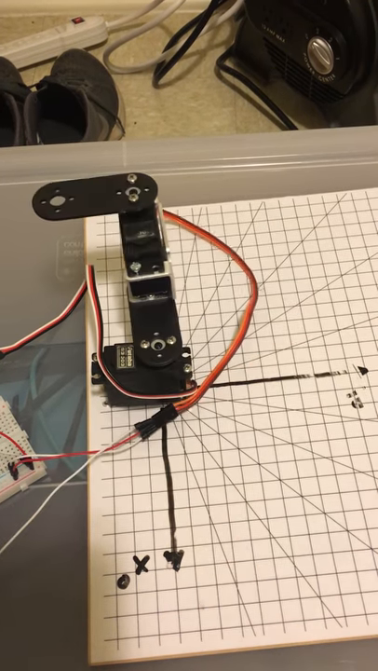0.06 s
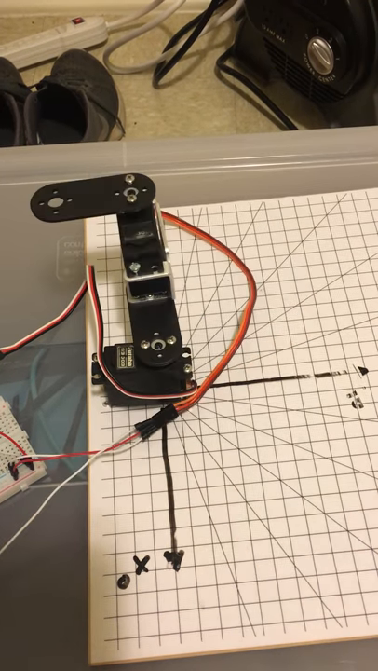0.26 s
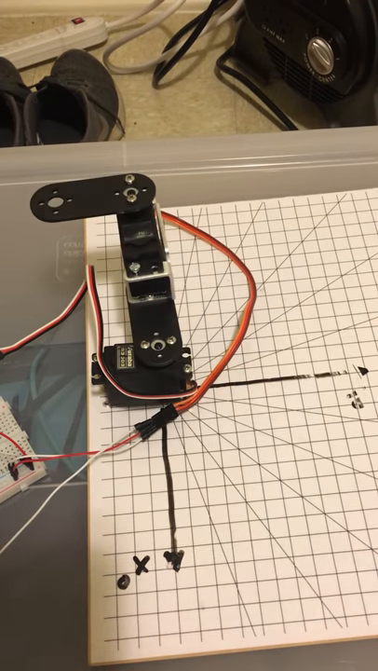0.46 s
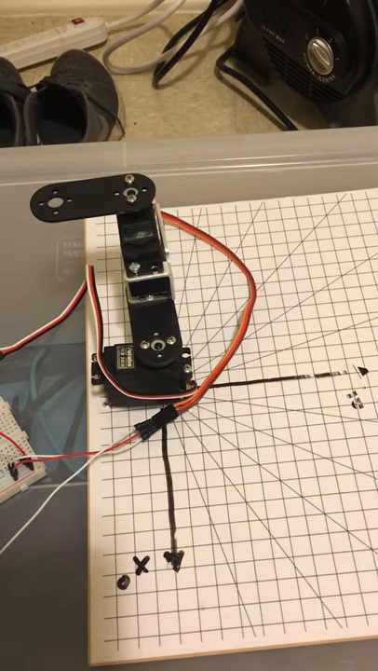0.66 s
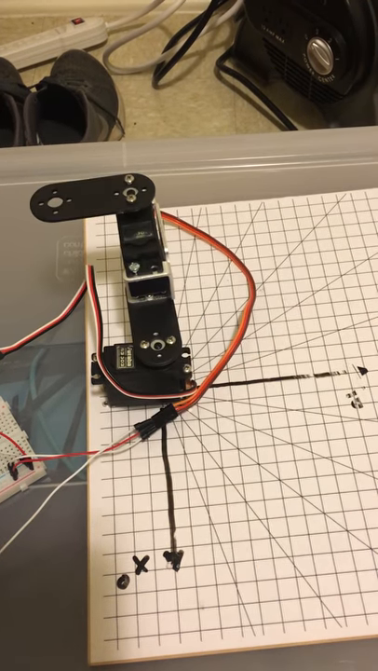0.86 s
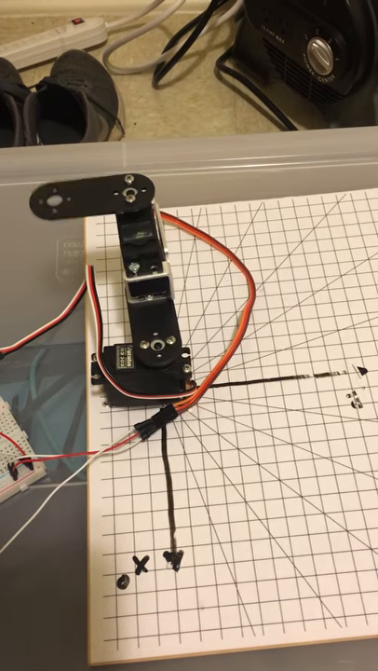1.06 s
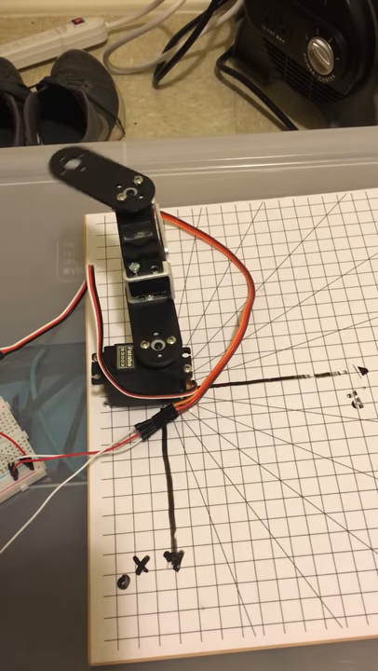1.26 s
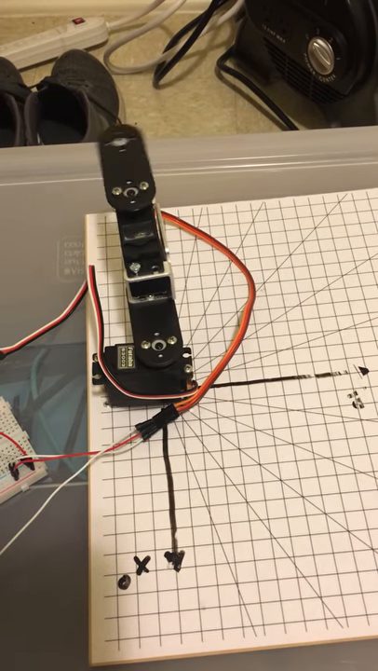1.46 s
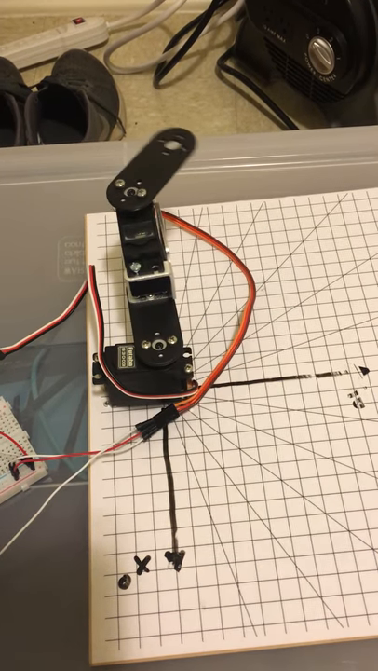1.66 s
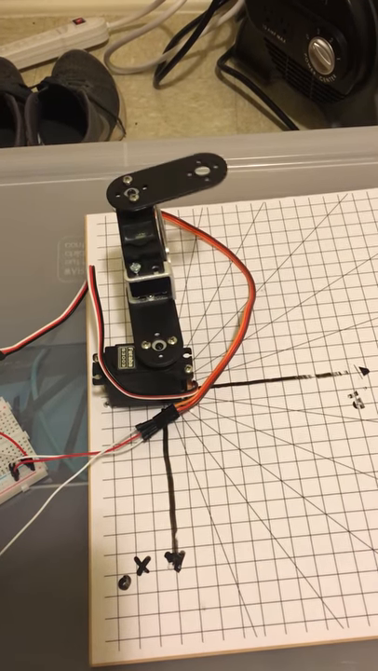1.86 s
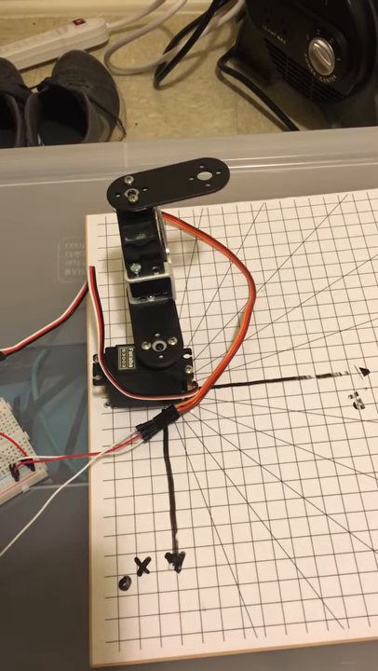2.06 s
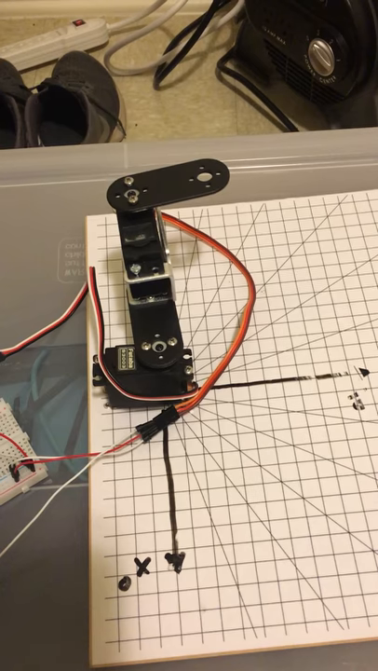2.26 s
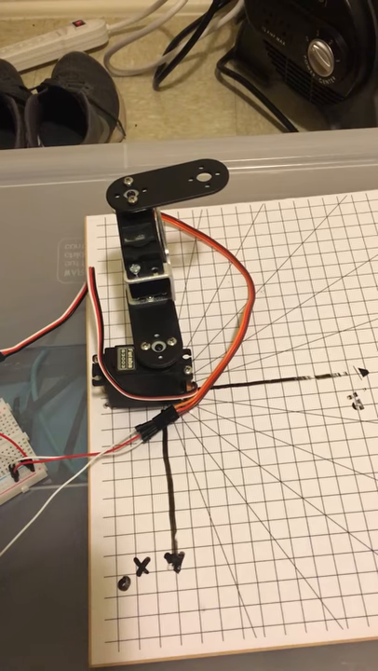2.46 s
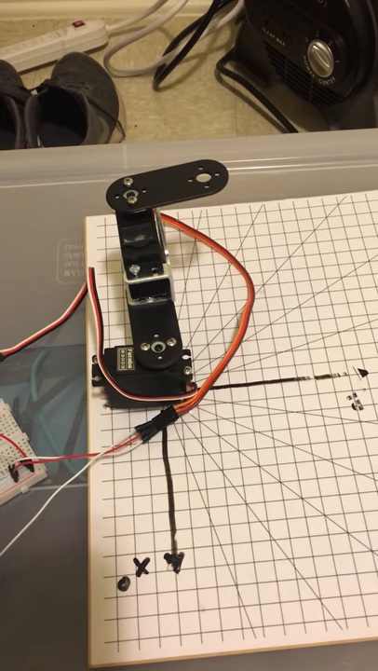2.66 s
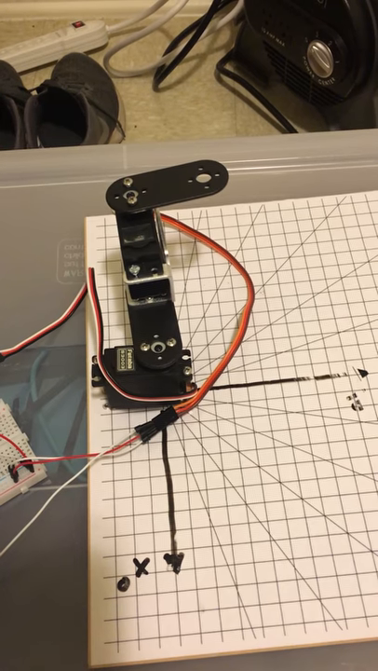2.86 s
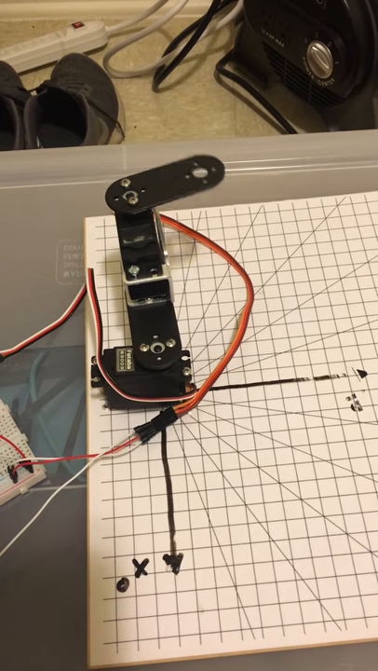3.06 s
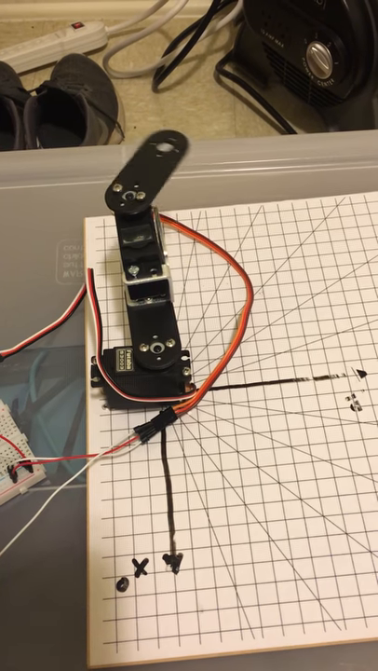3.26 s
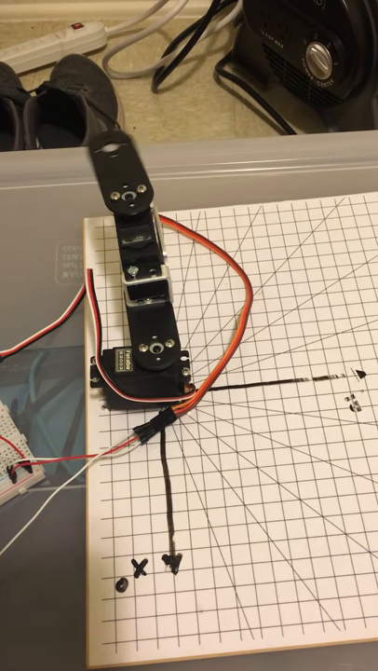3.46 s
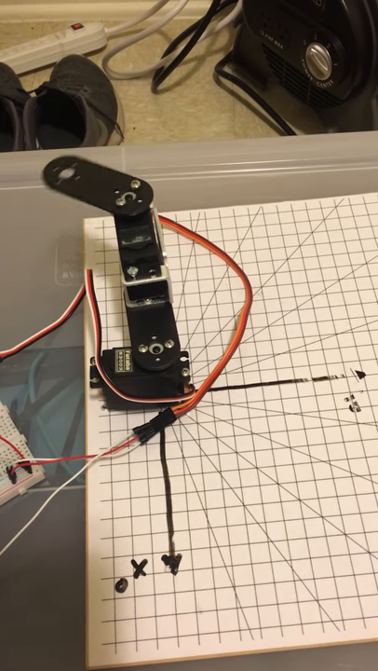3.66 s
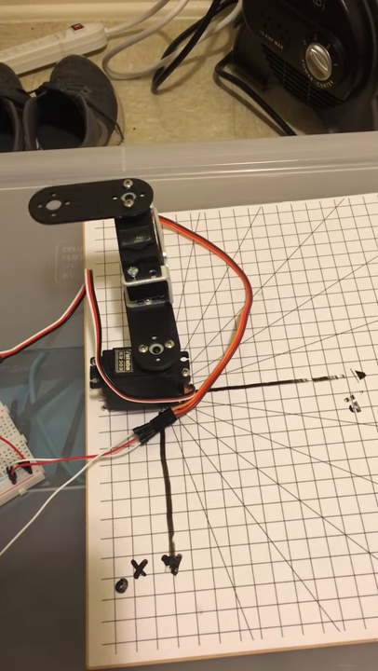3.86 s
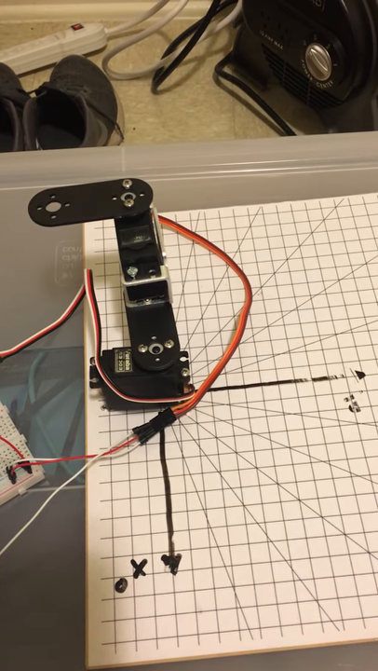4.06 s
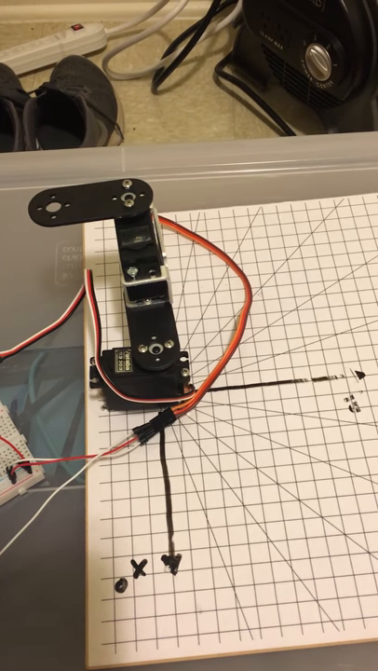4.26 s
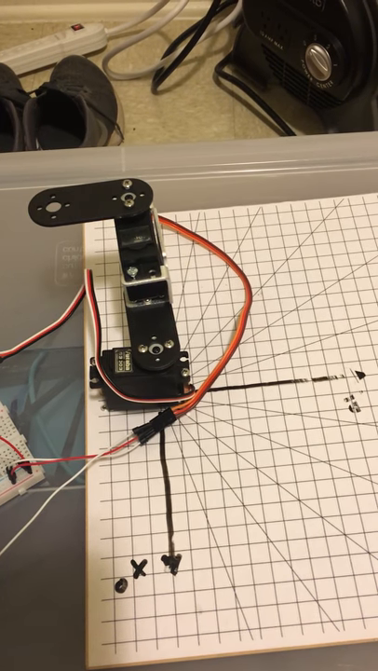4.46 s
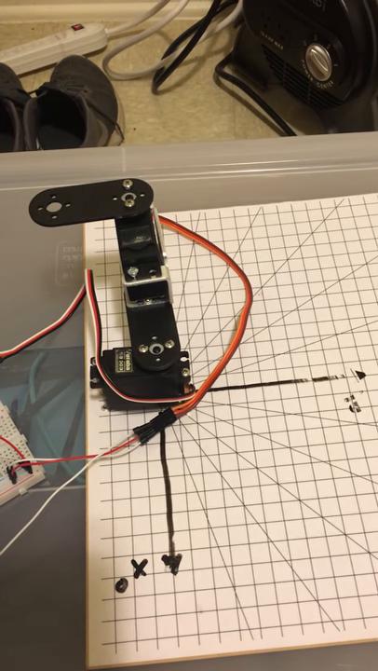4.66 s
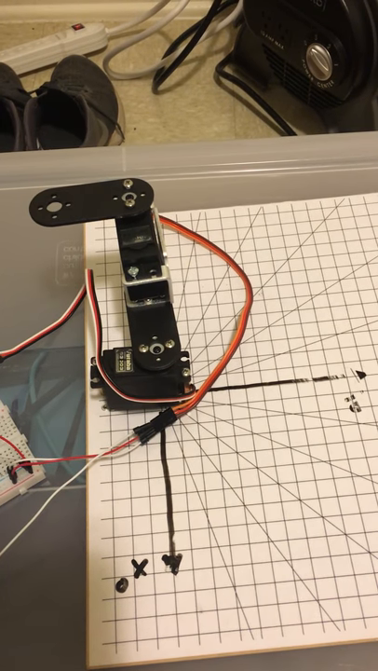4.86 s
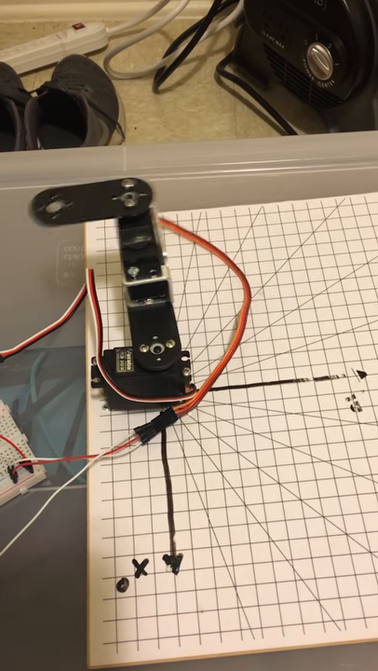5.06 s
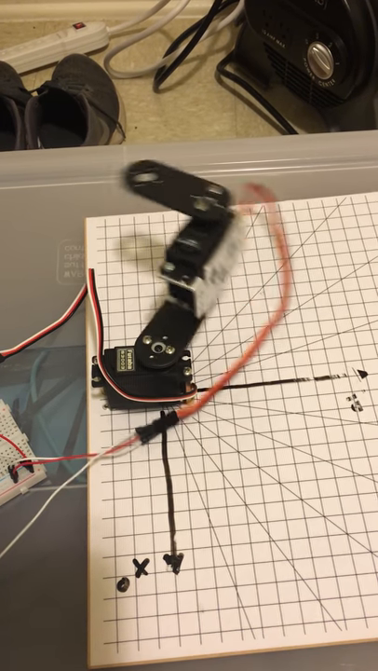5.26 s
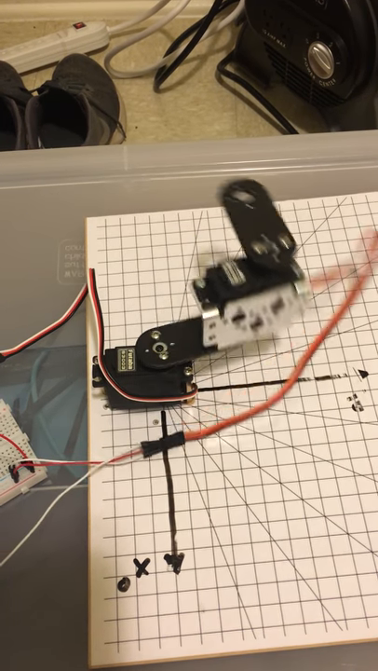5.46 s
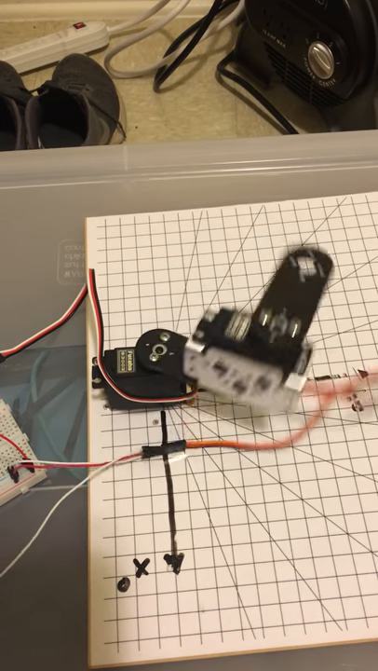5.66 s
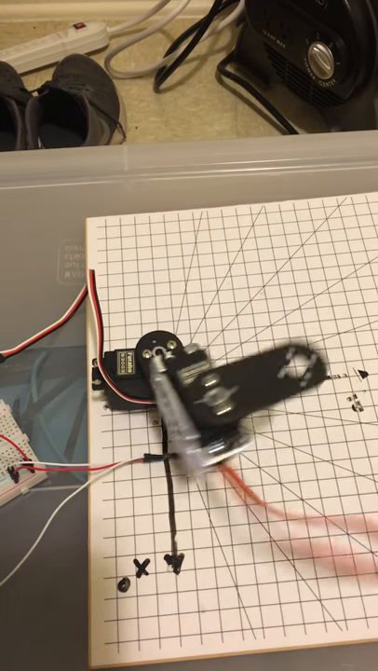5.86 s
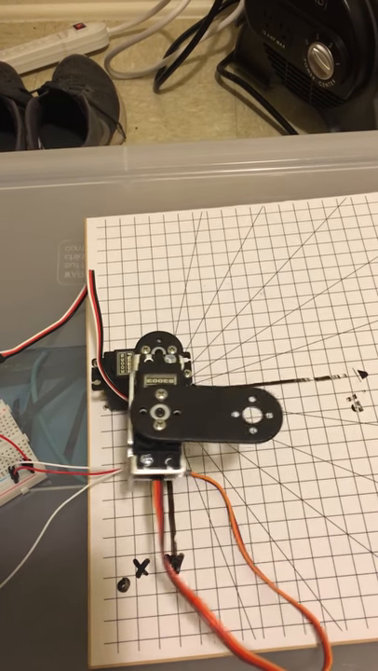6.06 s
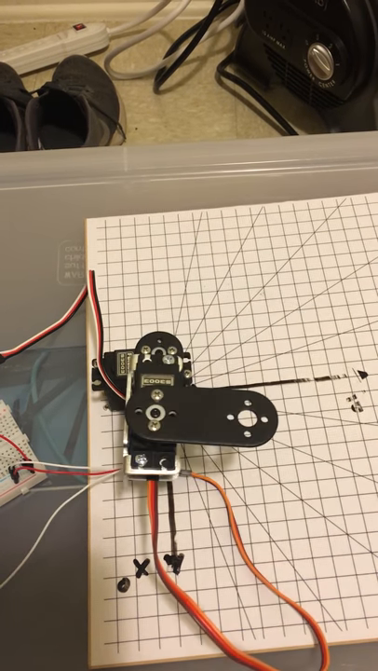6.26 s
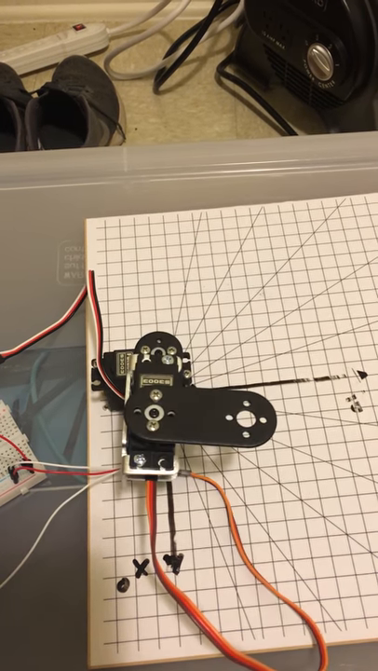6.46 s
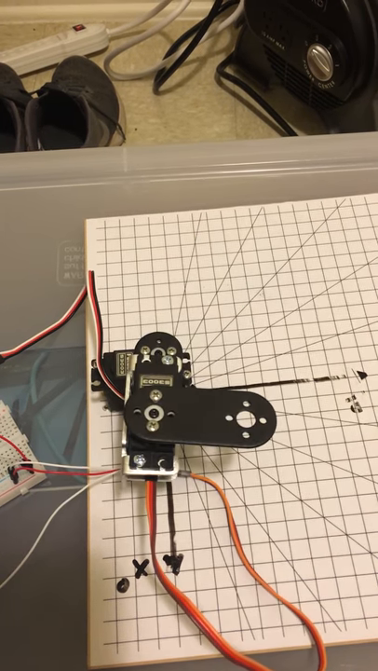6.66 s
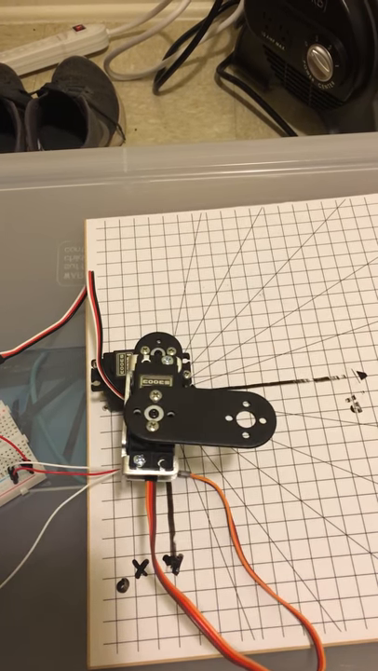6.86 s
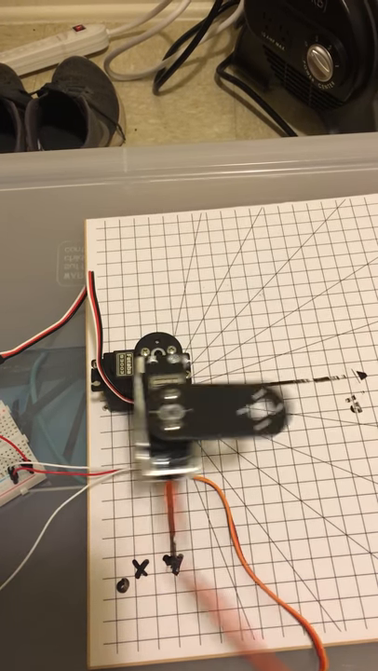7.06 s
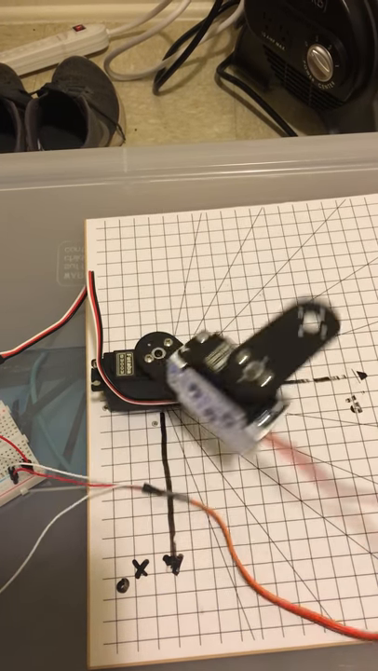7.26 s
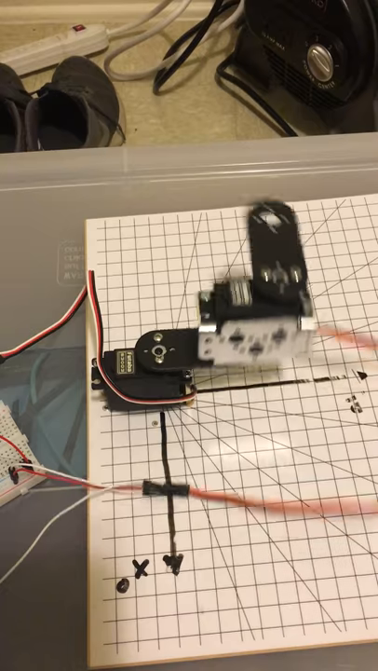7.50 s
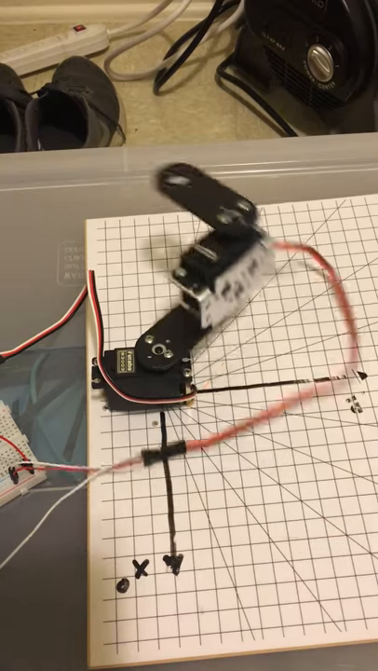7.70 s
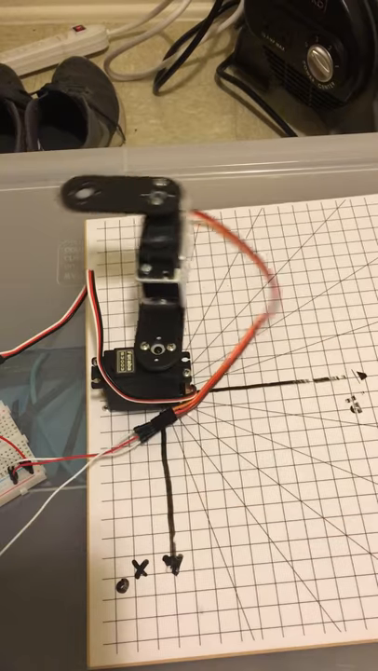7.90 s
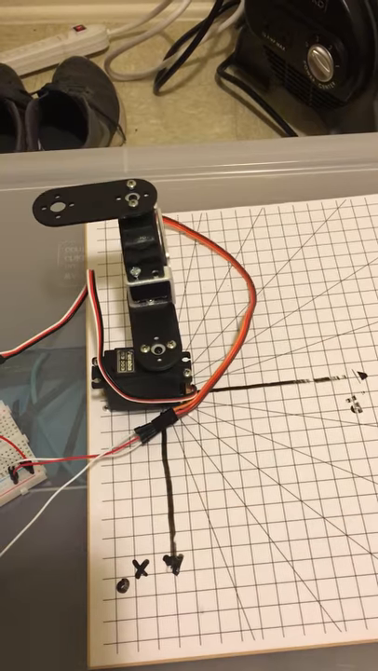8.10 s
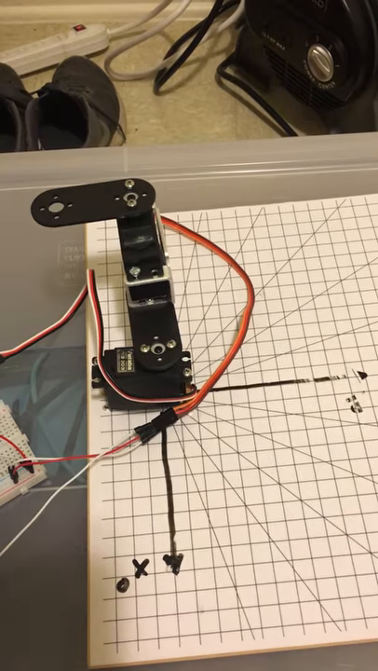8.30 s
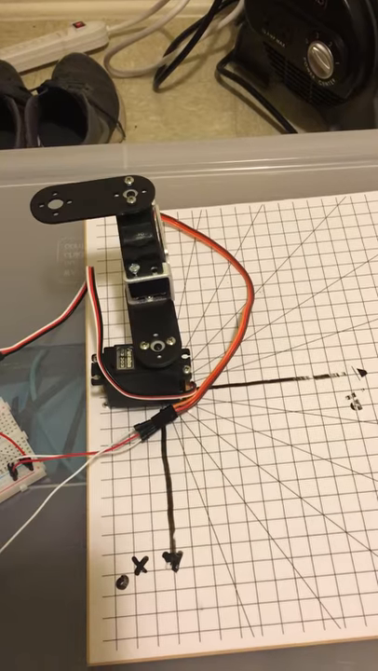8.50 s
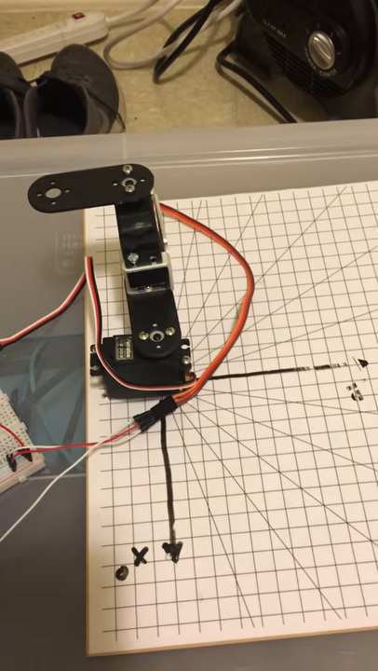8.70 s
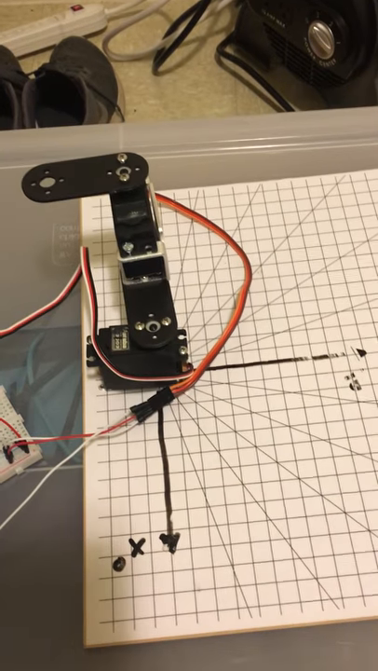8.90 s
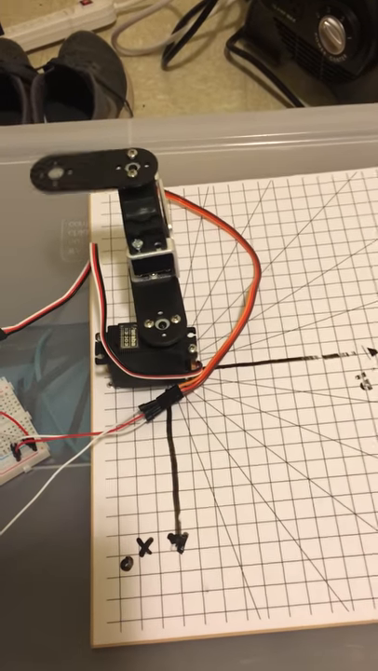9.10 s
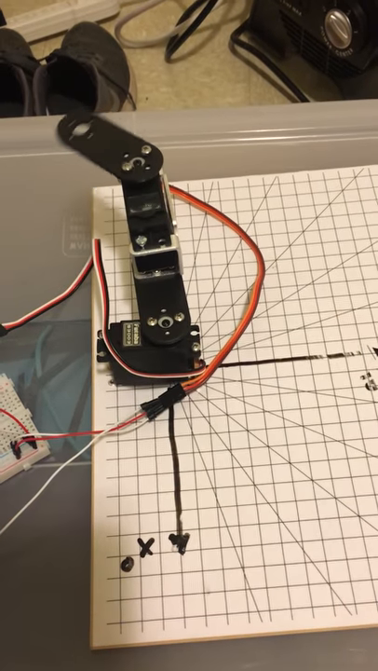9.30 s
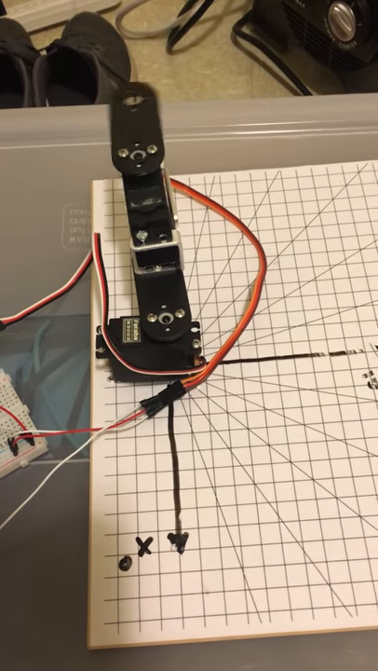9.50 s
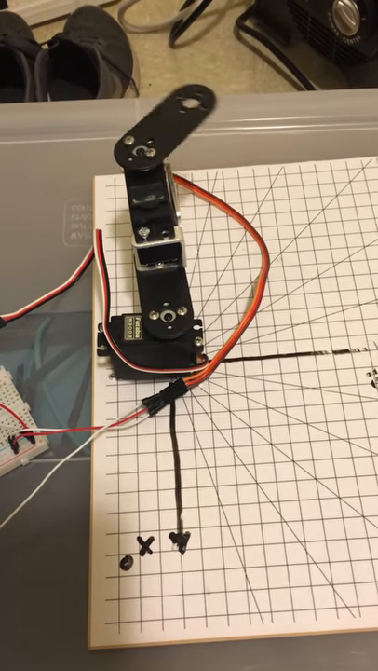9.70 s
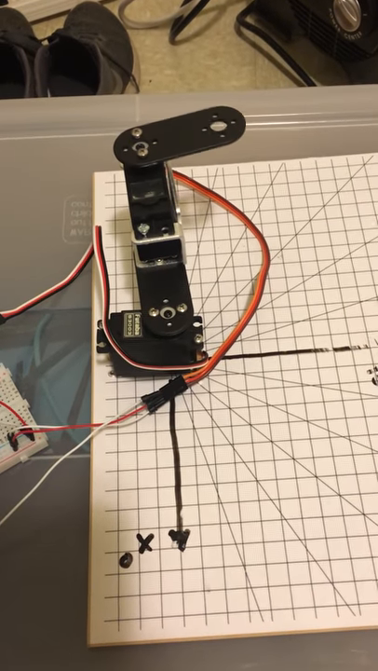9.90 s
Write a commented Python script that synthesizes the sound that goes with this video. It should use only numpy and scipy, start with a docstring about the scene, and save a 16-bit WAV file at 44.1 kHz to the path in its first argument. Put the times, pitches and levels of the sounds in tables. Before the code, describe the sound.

A fan hums low and blows softly throughout, in a small room. Close to the microphone, a robot arm's servo whir dies away right at the start, with a faint click. At about 1.1 seconds plastic gears click and a small servo whirs for just under a second, a high buzzy rattle with a thin whine. A similar, slightly softer whir follows from 3.1 to 4 seconds. A fuller, raspier whir runs from 5.1 to 6.1, and another from 7.1 to 8.1, opening with a sharp click and two quick knocks of the base on a board. Small gear clacks come near 8.2 and 9 seconds, then a last whir like the first runs from 9.1 to about 10. Between swings the servos tick faintly and so fast it is almost a buzz, clearest from 2 to 3 and 6.5 to 7 seconds.

```python
"""Two hobby servos swing a small arm in turn on a board, close to a phone's microphone in a room. Motor pinion
and gear train whir in their cases; each motor shaft thrums close to the pitch of the mains hum and beats with
it. Between swings the servos hold position and tick once per control pulse. Gear play clacks, something else
nearby clicks once, and the arm's base knocks the board twice. Behind them a fan hums and blows."""
import sys
import numpy as np
from scipy import signal
from scipy.fft import rfft, irfft, next_fast_len
from scipy.io import wavfile
from scipy.ndimage import uniform_filter1d, map_coordinates

SR = 44100
rng = np.random.default_rng(int(sys.argv[2]) if len(sys.argv) > 2 else 0)


def digitize_waveform(pressure):
    """Quantize a signal to 16-bit integers and store it at the path in sys.argv[1].

    Rows of a 2-D input are taken as channels; values are limited to [-1, 1].
    """
    field = np.atleast_2d(pressure).T
    bounded = np.clip(field, -1, 1)
    quanta = np.round(bounded * 32767).astype(np.int16)
    wavfile.write(sys.argv[1], SR, quanta)


N = 438354
T = np.arange(N) / SR
MAINS_HZ = 119.9

# case and arm resonances for each servo and direction: f/Hz, width/Hz, level/dB
ELBOW_OUT = [(1200, 90, -10.5), (1910, 74, -16), (2260, 340, -20.5), (3070, 230, -14), (4660, 180, -10),
             (5590, 440, -10.5), (6000, 170, -9), (7060, 237, -2), (8060, 120, -4), (8860, 91, -5.5),
             (11550, 270, -22.5), (13400, 500, -23), (14900, 550, -22.5)]
ELBOW_BACK = [(1170, 147, -6.5), (2400, 460, -20.5), (3110, 450, -17), (4130, 170, -18), (4740, 260, -11),
              (5130, 300, -12), (6120, 570, -3.5), (7040, 310, 1), (8200, 280, -9), (8900, 320, -13.5),
              (11800, 580, -19.5), (12900, 500, -20), (14600, 900, -29)]
SHOULDER_OUT = [(1170, 115, -6), (1920, 140, -7.5), (2350, 206, 0.5), (3010, 310, 4), (3420, 145, 8),
                (4510, 450, 1), (5770, 490, 4.5), (6470, 510, 2.5), (7150, 300, 4), (8580, 1200, 2.5),
                (9350, 600, -6), (11400, 790, -35), (13000, 1200, -12), (15000, 900, -53)]
SHOULDER_BACK = [(1150, 120, -3.5), (2270, 480, 1.5), (2820, 280, 4), (3294, 300, 10.5), (4280, 233, 3),
                 (4820, 240, 9.5), (5700, 350, 6), (6920, 770, 7.5), (8260, 810, 7.5), (9100, 570, 5.5),
                 (9200, 170, 4), (11800, 900, -21), (13100, 1500, -15), (15000, 710, -56)]
# ways of running: resonances, rattle's gear throb/0-1, its shaft throb/0-1, tone's gear throb/0-1,
# 2nd harmonic/dB, 3rd/dB, tone waver/dB, spin-up/s, rattle rise/s, braking/(full speed per s),
# fade/(dB per s), early boost of the strongest resonance/dB, late boost/dB, change after/s
ELBOW_RIGHTWARD = (ELBOW_OUT, .25, .25, .45, -14, -25, 1.2, .064, .038, 3.4, 240, -2.5, 1.5, .58)
ELBOW_LEFTWARD = (ELBOW_BACK, .15, .18, .5, -8, -25, 3, .055, .016, 2.8, 270, 2, -.5, .5)
SHOULDER_DOWN = (SHOULDER_OUT, .22, .12, .4, 2, 11, 1.8, .052, .04, .7, 190, 1.5, 7, .93)
SHOULDER_UP = (SHOULDER_BACK, .2, .15, .35, -3, -3, 1.8, .045, .025, .6, 230, -.5, 4, .55)
# modes the holding ticks ring with: f/Hz, level/dB, t60/s
ELBOW_LEFT = [(7500, -3, .006), (8450, -2, .006), (9480, 0, .0075), (5800, 0, .004), (4200, 0, .004)]
ELBOW_RIGHT = [(9150, 0, .0055), (7100, -7, .005), (5800, -7, .004), (11600, -17, .004)]
SHOULDER = [(3200, -1, .0065), (3600, -2, .0065), (5600, -1, .0055), (6200, 0, .006), (9100, -3, .004),
            (11500, -4, .004), (12400, -4, .004)]


def amp(db):
    return 10 ** (np.asarray(db) / 20)


def unit_rms(x):
    return x / np.sqrt(np.mean(x ** 2) + 1e-20)


def wobble(rate):
    """A smooth random curve, rate knots a second."""
    knots = rng.standard_normal(int(N * rate / SR) + 4)
    return map_coordinates(knots, [T[::8] * rate]).repeat(8)[:N]


def knee(t, soft_s=.012):
    """Time past zero, with a rounded corner."""
    return soft_s * np.logaddexp(0, t / soft_s)


def filtered(x, response):
    """x through a complex response of frequency."""
    size = next_fast_len(len(x) + 8192)
    return irfft(rfft(x, size) * response(np.fft.rfftfreq(size, 1 / SR)), size)[:len(x)]


def resonance(hz, width):
    """Gain curve of one resonance."""
    return lambda f: f * width / np.sqrt((hz * hz - f * f) ** 2 + (f * width) ** 2)


def strike(out, start, modes, db, noisy, rise_s):
    """Add one blow to out: decaying modes of alternating sign, partly blurred by noise."""
    t = np.arange(SR // 10) / SR
    blur = 1 + 4 * noisy * uniform_filter1d(rng.standard_normal((len(modes), len(t))), size=16)
    ring = sum((-1) ** k * amp(mode_db - 60 * t / t60) * blur[k] * np.sin(2 * np.pi * hz * t)
               for k, (hz, mode_db, t60) in enumerate(modes))
    attack = (1 - np.exp(-t / rise_s)) ** 2
    part = out[round(start * SR):][:len(t)]
    part += (amp(db) * ring * attack)[:len(part)]


def swing(way, start, brake_s, fade_s, tooth_hz, rattle_db, tone_db, drift_db, thrum_db, in_step_s):
    """Meshing teeth rattle the case and sing a tone, both throbbing with each turn of shaft and gear."""
    case, gear_depth, shaft_depth, tone_depth, second_db, third_db, waver_db = way[:7]
    spin_up_s, rise_s, brake_rate, fade_rate, early_db, late_db, change_s = way[7:]
    pinion_teeth, gear_teeth = 10, 50
    part = slice(max(round(start * SR), 0), round((start + fade_s + .3) * SR))
    t = T[part] - start
    speed = np.clip(1 - np.exp(-t / spin_up_s) - brake_rate * knee(t - brake_s), 1e-3, 1)
    mesh = 2 * np.pi * np.cumsum(tooth_hz * speed + 2.5 * wobble(30)[part]) / SR
    shaft_throb = np.cos(mesh / pinion_teeth) + .6 * np.cos(2 * mesh / pinion_teeth)
    fade = amp(-fade_rate * knee(t - fade_s))

    uneven = (1 + shaft_depth * shaft_throb) * amp(.8 * wobble(100)[part])  # no two teeth strike alike
    strongest_db = max(db for _, _, db in case)
    boost_db = early_db + (late_db - early_db) * (1 + np.tanh((t - change_s) / .04)) / 2
    case_noise = 0
    for hz, width, db in case:
        # each part of the case feels the gear's high spot at another angle, the treble less
        angle = mesh / gear_teeth + rng.normal(0, .5)
        gear_throb = 1 + gear_depth * min(1, 7000 / hz) * (np.cos(angle) + .5 * np.cos(2 * angle))
        swell_db = .8 * wobble(6)[part] + (db == strongest_db) * boost_db
        impacts = gear_throb * uneven * rng.standard_normal(len(t))
        case_noise += amp(db + swell_db) * filtered(impacts, resonance(hz, width))
    bite = (1 - np.exp(-t / rise_s)) ** 5  # the rattle hesitates, then bites
    rattle = amp(rattle_db) * bite * fade * unit_rms(case_noise)

    overtones = amp(second_db) * np.sin(2 * mesh) + amp(third_db) * np.sin(3 * mesh)
    tone = np.sin(mesh) + speed ** 4 * overtones
    tone *= (1 + .2 * shaft_throb) * (1 + tone_depth * np.cos(mesh / gear_teeth))
    tone *= amp(tone_db + drift_db * t + waver_db * wobble(40)[part]) * speed ** 5 * fade
    tone *= (1 + np.tanh((speed - .84) / .03)) / 2  # sets in near 84 % of full speed

    shaft_angle = (mesh - np.interp(in_step_s - start, t, mesh)) / pinion_teeth
    thrum = amp(thrum_db) * speed ** 18 * np.sin(shaft_angle + 2 * np.pi * MAINS_HZ * in_step_s)
    out = np.zeros(N)
    out[part] = rattle + np.sqrt(2) * (tone + thrum)
    return out


def servo_swings():
    """Shoulder and elbow whir in turn, close to the microphone."""
    # arm moves: way, t/s, brake after/s, fade after/s, tooth f/Hz, rattle level/dB, tone level/dB,
    # tone drift/(dB per s), thrum level/dB, t/s at which the thrum is in step with the mains hum
    swings = [(SHOULDER_UP, -.92, .66, .91, 1178, -38.5, -56, -8, -62, .01),
              (ELBOW_RIGHTWARD, 1.095, .79, .83, 1232, -38, -48, .5, -44, 1.69),
              (ELBOW_LEFTWARD, 3.1, 0.7, 0.82, 1217, -40, -58.5, -16, -47, 3.63),
              (SHOULDER_DOWN, 5.1, .92, .91, 1165, -36.5, -65.5, 8, -58, 5.58),
              (SHOULDER_UP, 7.1, .66, .9, 1178, -38.5, -53, -11.5, -61, 7.8),
              (ELBOW_RIGHTWARD, 9.115, .79, .83, 1234, -38, -48.5, .5, -44.5, 9.67)]
    return sum(swing(*row) for row in swings)


def fan():
    """The fan in the room: mains hum, slightly unsteady blade tones and the rush of air."""
    # blade-pass harmonics: order, rms level/dB
    blade_tones = [(1, -56.5), (4, -59.5), (5, -68), (6, -69.5)]
    # spectrum of the rushing air: f/Hz, relative level/dB
    air_spectrum = [(20, -25.5), (40, -9.5), (52, -2.5), (80, -6.5), (100, -1), (135, -4), (165, -3.5),
                    (220, -7.5), (380, -14.5), (480, -22.5), (1400, -28), (2500, -36.5), (5000, -46),
                    (9000, -49.5), (10500, -54.5), (16000, -51)]
    blade_hz, hum_db, hum_sink_db_per_s = 58.85, -45.5, .28
    hum = amp(hum_db - hum_sink_db_per_s * T + .33 * wobble(3.8)) * np.sin(2 * np.pi * MAINS_HZ * T)
    blade_phase = 2 * np.pi * np.cumsum(blade_hz + .1504 * wobble(2.5)) / SR
    blades = sum(amp(db + 1.84 * wobble(4.4)) * np.sin(k * blade_phase) for k, db in blade_tones)
    air_hz, air_db = np.transpose(air_spectrum)
    white = rng.standard_normal(N)
    air = filtered(white, lambda f: amp(np.interp(np.log(f + 1), np.log(air_hz), air_db)))
    return np.sqrt(2) * (hum + blades) + amp(-51 + .2 * wobble(2.6)) * unit_rms(air)


def holding_ticks():
    """At each control pulse a holding motor gets a short kick of current and ticks."""
    # spells of holding: modes, from t/s, to t/s, delay after the pulse/s, level/dB
    holds = [(ELBOW_LEFT, .12, 1.2, 0, -56), (ELBOW_RIGHT, 2.05, 4, .0002, -46),
             (ELBOW_LEFT, 3.5, 6, 0, -55), (SHOULDER, 6.09, 6.2, 0.0036, -44),
             (ELBOW_LEFT, 5.6, 7.1, 0.0021, -53.5), (SHOULDER, 6.27, 6.32, 0.0043, -44.5),
             (SHOULDER, 6.38, 6.45, .0042, -45.5), (SHOULDER, 6.52, 7.11, 0.0037, -41.5),
             (ELBOW_LEFT, 6.8, 10, 0, -58)]
    first_pulse_s, pulse_period_s = .0092, .020042
    out = np.zeros(N)
    for modes, start, end, delay, db in holds:
        for tick_s in np.arange(first_pulse_s + delay, N / SR, pulse_period_s):
            if start < tick_s < end:
                strike(out, tick_s, modes, db + rng.normal(0, .8), noisy=.5, rise_s=.001)
    return out


def gear_clacks():
    """The plastic gears take up their play with short blows; the blow near 9.03 s is a click from something
    else nearby."""
    # blows: t/s, relative level/dB, gain of the low modes/dB
    clacks = [(0.1695, -55.5, 7), (1.1069, -44, -19), (1.1298, -45, -11), (2.1545, -54, -15),
              (2.1755, -56, -14), (3.1266, -43, -15), (5.118, -54, 6), (5.135, -42, -14), (5.155, -43, 4),
              (7.121, -37, -13), (8.1674, -51.5, 6), (8.2077, -56.5, 5), (9.0343, -41, 1.5),
              (9.1257, -47, -18), (9.1466, -44, -19)]
    # modes of the plastic: f/Hz, level/dB
    plastic = [(1800, -2), (3000, -1), (3900, -12), (5200, -0.5), (7000, -10.5), (8500, -14), (11000, -28)]
    t60_s, low_below_hz = .029, 4500
    out = np.zeros(N)
    for start, db, low_db in clacks:
        modes = [(hz, mode_db + (low_db if hz < low_below_hz else 0), t60_s) for hz, mode_db in plastic]
        strike(out, start, modes, db - 9, noisy=1.5, rise_s=.0004)
    return out


def base_knocks():
    """The arm's base knocks the board, which rings briefly."""
    # knocks: t/s, level/dB, brightness/(dB per octave)
    knocks = [(7.176, -33, -4), (7.21, -31, 3.5)]
    # modes of the board: f/Hz, level/dB, t60/s
    board = [(800, -3, .012), (1150, 0, .012), (1600, 0, .014)]
    out = np.zeros(N)
    for start, db, tilt in knocks:
        modes = [(hz, mode_db + tilt * np.log2(hz / 800), t60) for hz, mode_db, t60 in board]
        strike(out, start, modes, db, noisy=.2, rise_s=.001)
    return out


def room(x, t60, dull_hz):
    """The room answers with a short decaying tail that lacks bass and treble."""
    t = np.arange(SR // 3) / SR
    tail = rng.standard_normal(len(t)) * amp(-60 * t / t60) * (t > .003)
    tail = filtered(tail, lambda f: (f > 300) / (1 + 1j * f / dull_hz))
    return signal.fftconvolve(x, tail / np.linalg.norm(tail))[:N]


def scene():
    """The arm up close, with a little room echo and the fan behind it, in mono."""
    whir = servo_swings()
    blows = holding_ticks() + gear_clacks() + base_knocks()
    echo = room(amp(-11) * whir + amp(-8) * blows, t60=.25, dull_hz=7000)
    return (whir + blows + echo + fan())[None]


def record(dry):
    """The phone keeps nothing above its band limit."""
    top_hz = 15690
    return filtered(dry[0], lambda f: f < top_hz)[None]


dry = scene()
out = record(dry)
digitize_waveform(out)
```